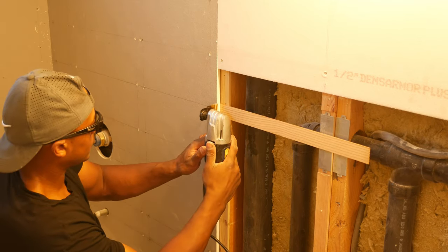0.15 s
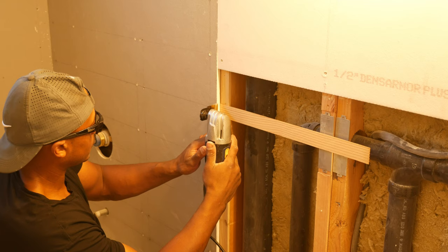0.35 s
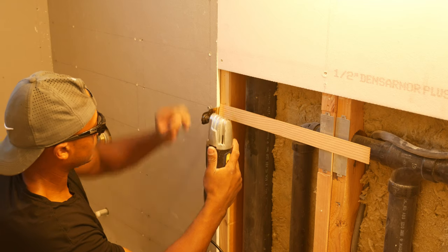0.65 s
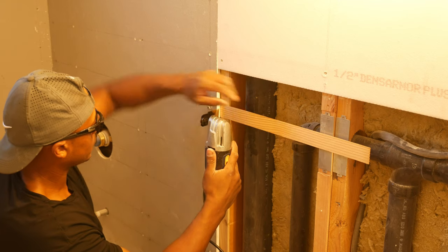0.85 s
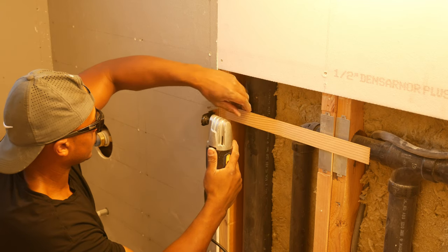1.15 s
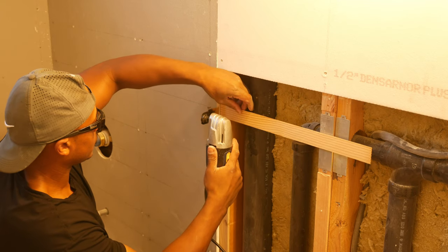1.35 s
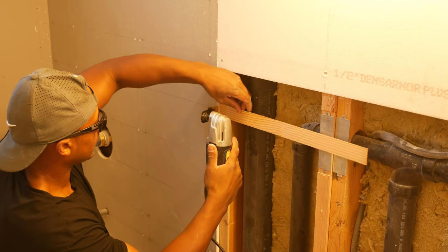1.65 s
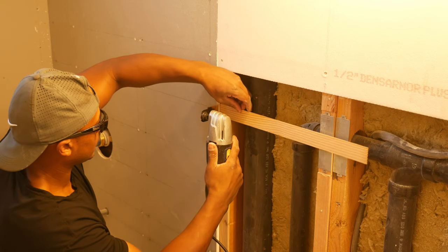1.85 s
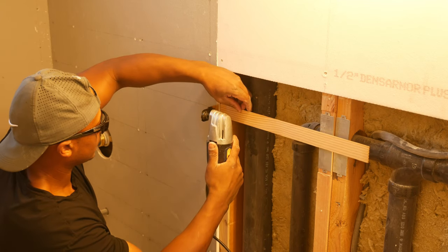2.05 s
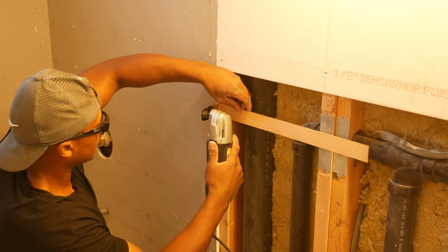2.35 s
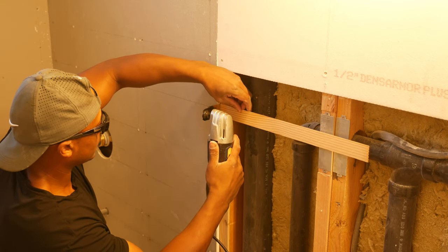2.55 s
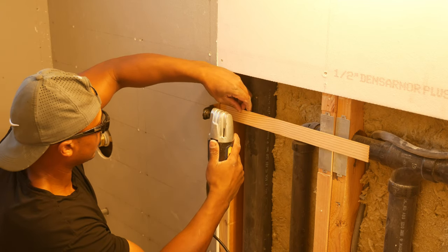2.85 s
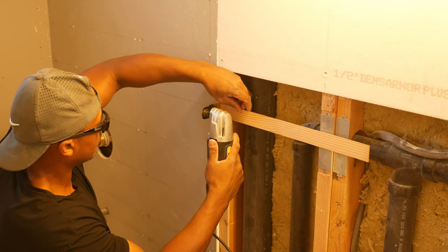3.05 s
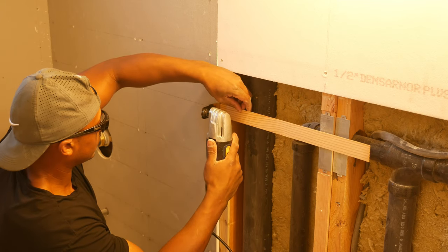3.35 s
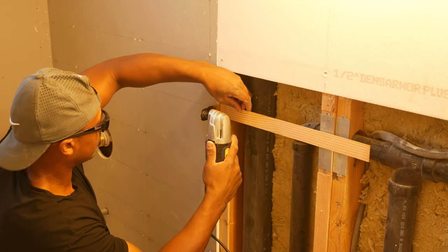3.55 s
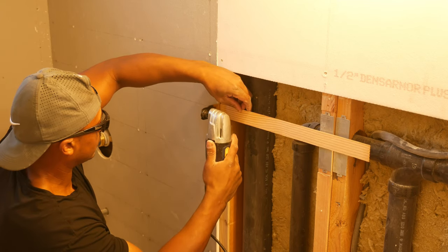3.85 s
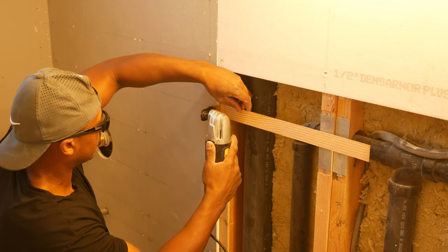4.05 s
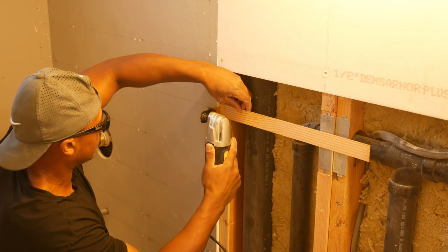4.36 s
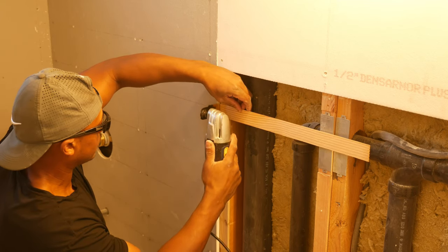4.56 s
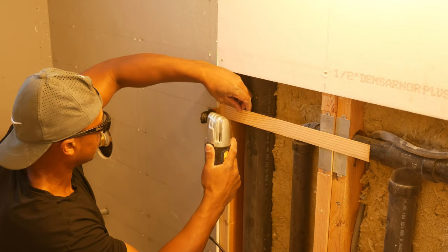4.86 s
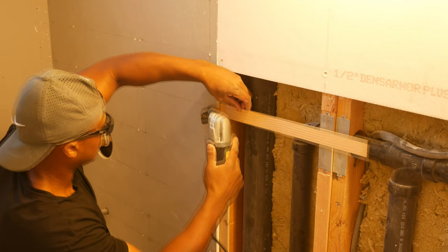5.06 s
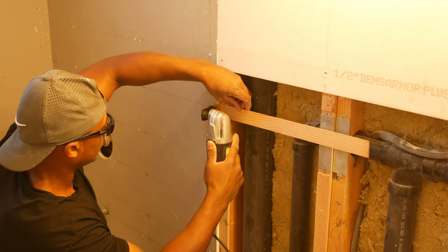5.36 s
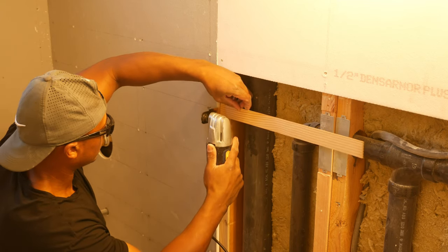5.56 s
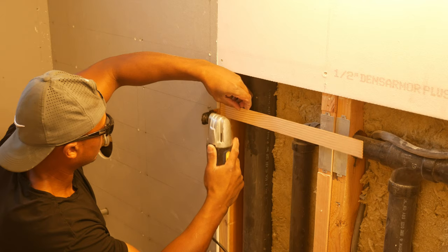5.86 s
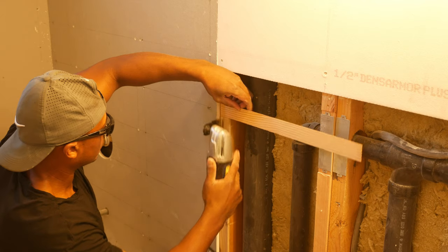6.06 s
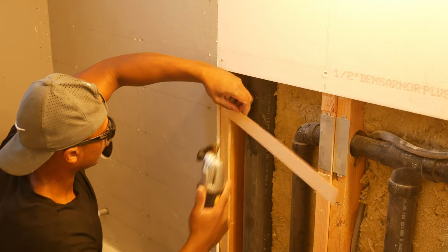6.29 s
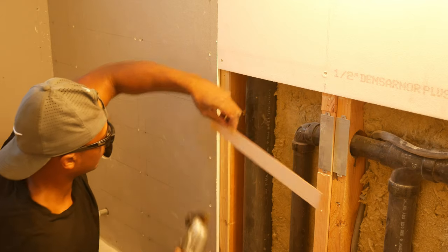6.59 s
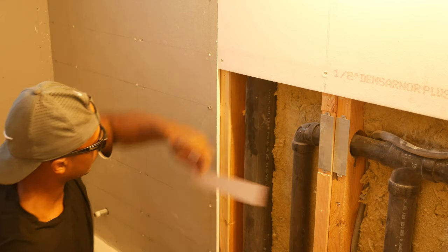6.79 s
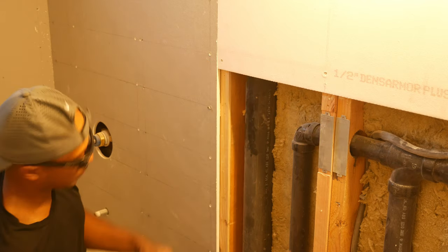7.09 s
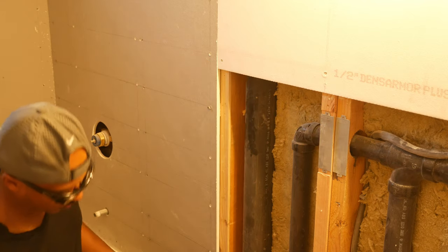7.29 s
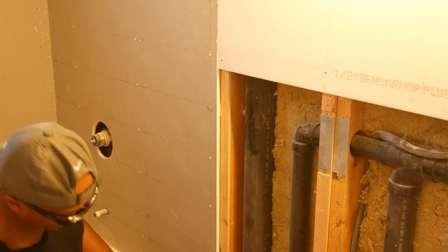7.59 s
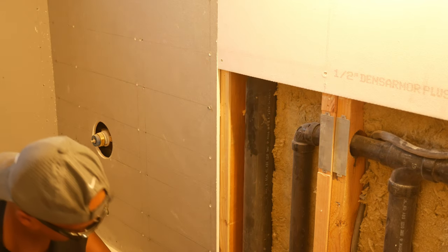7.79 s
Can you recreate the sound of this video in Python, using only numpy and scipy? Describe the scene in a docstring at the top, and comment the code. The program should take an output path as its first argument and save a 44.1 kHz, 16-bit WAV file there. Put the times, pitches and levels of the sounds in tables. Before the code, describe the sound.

Close in a small bare room, an oscillating multi-tool is already running, its nasal buzz rising slightly amid rattle and bright hiss. Pressed into a thin wooden strip, it slows, turns rough and raspy, and makes the wall hum. It breaks free, regains its speed, then switches off with its pitch starting to glide down. Nearly mono, dry, with short wall reflections.

```python
"""An oscillating multi-tool saws a thin wooden strip at a stud wall in a small bare room, heard almost in mono.
It opens running free and gaining speed: the mains motor swings the blade once a turn, a stack of shaft tones
rippled at twice the mains rate, amid rattling hiss, knocks and bright hiss bursts. From about 2.3 s, pressing
into the wood slows the shaft, shakes the wall into a hum and adds bright rasp. After 6.2 s the shaft recovers
freely; at 7.45 s the tool is switched off, and its tones glide down past resonances of the loose blade."""
import sys
import numpy as np
from scipy import signal
from scipy.fft import next_fast_len
from scipy.io import wavfile
from scipy.ndimage import uniform_filter1d, map_coordinates

SR = 44100
rng = np.random.default_rng(int(sys.argv[2]) if len(sys.argv) > 2 else 0)


def waveform_to_disk(signal):
    """Save audio, clipped to [-1, 1], as 16-bit WAV at the path in sys.argv[1]."""
    frames = np.transpose(np.atleast_2d(signal))
    scaled = np.clip(frames, -1, 1) * 32767
    samples = np.round(scaled).astype(np.int16)
    wavfile.write(sys.argv[1], SR, samples)


N = 349713
STEP = 64  # samples between control points
RIPPLE_HZ, OFF_S = 120, 7.449  # torque ripple at twice the mains rate; moment of switching off

# how irregular the swing of the blade is: (time [s], unevenness [0-1])
UNEVEN = [(0, .2), (1, .08), (3, .08), (3.4, .2), (4.9, .4), (5.05, .8), (5.4, .5), (6, .4), (6.5, .26),
          (7.4, .2), (7.55, .28), (7.93, .36)]
# spectrum of the rattling hiss and of the knocks: (frequency [Hz], relative density [dB per Hz])
RATTLE = [(25, -63), (280, -59), (370, -33), (560, -22), (1020, -12.5), (1300, -11.5), (2100, -11.5),
          (2600, -3.5), (3600, 0), (6000, -6), (8000, -9.5), (9700, -19.5), (10100, -24), (12800, -29.5),
          (14200, -44), (15500, -49)]
# resonances of the blade: (frequency [Hz], width [Hz], lift [dB])
BLADE = [(6000, 90, 4), (9630, 60, 6), (10375, 100, 13), (10745, 80, 9), (11480, 70, 10), (13125, 120, 11),
         (13700, 130, 9), (14420, 200, 7), (14880, 250, 7)]
# resonances of the housing, colouring hiss and knocks: (frequency [Hz], width [Hz], lift [dB])
HOUSING = [(1033, 81, -9), (2210, 120, -1), (2440, 150, 2), (3200, 380, -2), (3580, 280, 0), (4150, 140, 3),
           (5000, 390, 1), (3650, 64, 3.5), (4237, 55, 1), (2730, 48, 0.5), (3310, 30, 2.5),
           (2160, 100, -1)]


def gain_of(db):
    """Amplitude factor of a level in dB."""
    return 10 ** (np.asarray(db) / 20)


def evened(x):
    """Scale to an rms of one."""
    return x / np.sqrt(np.mean(x ** 2) + 1e-20)


def read(points, hz):
    """Read a spectrum table along a logarithmic frequency axis."""
    f, value = np.transpose(points)
    return np.interp(np.log(hz + 1), np.log(f + 1), value)


def curves(rows):
    """Turn each column of a time table into one value a sample."""
    s, *columns = np.transpose(rows)
    return [np.interp(np.arange(N) / SR, s, c) for c in columns]


def fine(points):
    """Control points joined up to one value a sample."""
    return np.interp(np.arange(N), np.arange(0, N, STEP), points)


def lift(modes, hz):
    """Sum of resonance bumps in dB."""
    return sum(db / (1 + (2 * (hz - f) / width) ** 2) for f, width, db in modes)


def drift(per_s, count):
    """Random curves of rms near 1, from per_s random points a second, read at the control steps."""
    points = rng.standard_normal((count, 400))
    at = np.arange(0, N, STEP) / SR * np.clip(per_s, .1, 45)
    return [map_coordinates(p, [at], order=1) for p in points]


def noise(points, modes, patchy_db, flicker_db):
    """Random short-time spectra with drifting patches and a flicker shared by all bands."""
    frames, hz = N // 256 + 5, np.fft.rfftfreq(1024, 1 / SR)
    real, imaginary, patches = rng.standard_normal((frames, 513, 3)).T
    patches = uniform_filter1d(patches, size=10, axis=0)  # across frequency
    patches = evened(uniform_filter1d(patches, size=12, axis=1))  # across time
    flicker = evened(uniform_filter1d(rng.standard_normal(frames), size=4))
    colour_db = (read(points, hz) + lift(modes, hz))[:, None]
    db = colour_db + patchy_db * patches + flicker_db * flicker
    spectra = (real + 1j * imaginary) * gain_of(db)
    return evened(signal.istft(spectra, nperseg=1024, noverlap=768)[1][:N])


def speed():
    """Shaft speed in Hz: gains toward free speed, is dragged by the cut, recovers, and runs down once off."""
    # the cut slows the shaft; after the last row it recovers freely: (time [s], drag [Hz])
    drag_rows = [(2.3, 0), (2.75, 1), (3.0, 2.3), (3.3, 4.6), (3.75, 6.9), (4.0, 9.4), (4.3, 13.7),
                 (4.7, 17.5), (5.0, 18.4), (5.05, 38.5), (5.14, 41.2), (5.9, 35.1), (6.0, 29.4),
                 (6.2, 21.8)]
    free_hz, start_short_hz = 189.3, 16.1  # unloaded speed; shortfall at the start
    recover_s, coast_s = .655, 1.03  # time constants of gaining speed and of running down
    t = np.arange(N) / SR
    driven = np.minimum(t, OFF_S)
    since_cut = np.maximum(driven - drag_rows[-1][0], 0)
    drag = curves(drag_rows)[0] * np.exp(-since_cut / recover_s)
    driven_hz = free_hz - start_short_hz * np.exp(-driven / recover_s) - drag
    return driven_hz * np.exp(-(t - driven) / coast_s)


def tones(hz, turn, uneven):
    """Shaft multiples and their mains companions; an uneven swing rocks them and breaks them up."""
    # the motor's whine at the frequency a tone has reached: (frequency [Hz], relative level [dB])
    whine = [(600, -21.5), (1000, -17.5), (1400, -13), (2100, -10.5), (2600, -2), (3600, -5), (4500, -5.5),
             (6000, -8), (8000, -25)]
    # resonances of housing and room corner that change a tone passing through:
    # (frequency [Hz], width [Hz], lift [dB])
    corner_modes = [(720.6, 17, 8.5), (802, 11, 11), (869, 92, 8.5), (942, 6.7, -16), (990, 13, -3),
                    (1281, 133, 9.5), (1612, 113, 6), (1626, 21, 4.5), (1696, 5.2, -3), (1823, 170, 3),
                    (2054, 76, 6), (2423, 18, -8), (2370, 35, 0.5), (2412, 43, 8), (2640, 10, 3),
                    (2767, 96, 3.5), (3010, 22, -6), (3153, 42, 5), (3432, 37, 8.5), (3684, 190, 5.5),
                    (3880, 37, 6), (4250, 78, 7), (3326, 60, 0)]
    # once the drive is off the loose blade resonates with the gliding tones:
    # (frequency [Hz], width [Hz], lift [dB])
    loose = [(2810, 110, 9.5), (3007, 100, 12), (3184, 130, 9.5), (3410, 130, 9), (4250, 100, -12),
             (4870, 1200, 1)]
    # one multiple sings out, or drops away, for a while:
    # (middle [s], half length [s], multiple of shaft speed, change [dB])
    swells = [(0.525, 0.046, 20, 8.5), (0.49, 0.27, 22, 2), (0.92, 0.17, 5, 9.5), (0.85, 0.089, 13, 5.5),
              (1.31, 0.2, 15, 7), (1.9, 0.32, 21, 6.5), (1.9, 0.27, 12, 7), (1.8, 1.3, 4, 6.5),
              (1.64, 2.46, 8, 6.5), (1.93, 0.67, 14, 5), (2.78, 0.4, 21, 9), (2.53, .25, 17, 5.5),
              (2.93, 0.33, 13, 7.5), (2.83, 0.17, 9, 7.5), (2.93, 0.2, 6, 9.5), (3.062, 0.1, 17, 7),
              (3.14, 0.23, 10, 9.5), (3.1, 0.14, 15, 7), (3.36, 0.46, 23, 6.5), (3.57, 0.31, 7, 5),
              (3.854, 0.082, 6, 15), (3.99, 0.19, 5, 13), (4.33, 0.28, 4, 12.5), (4.45, 0.23, 8, 7),
              (4.72, 0.48, 6, 11), (5.4, 0.5, 4, 10), (5.47, 0.07, 16, 3), (5.55, 0.17, 5, 14),
              (4.85, .15, 14, -4), (3.02, .12, 16, 5), (3.35, .1, 18, 7), (5.7, 0.29, 6, 9.5),
              (6.3, 0.24, 18, 2), (5.5, 0.16, 11, 7), (6.13, 0.14, 7, 7), (6.29, 0.068, 5, 6.5),
              (6.565, 0.064, 17, 15), (6.598, 0.11, 11, 10), (6.696, 0.18, 7, 4), (6.9, 0.27, 4, 5),
              (6.723, 0.1, 13, 16), (6.86, 0.049, 8, 16.5), (6.944, 0.048, 13, 8), (7.3, 0.11, 13, 3.5),
              (7.14, 0.37, 6, 7.5), (7.204, 0.14, 8, 12.5), (7.623, 0.14, 5, 6.5), (.4, .5, 6, -9),
              (0.27, 0.33, 12, -13), (.15, 0.18, 8, -1), (0.76, 0.25, 8, -15), (1.34, 0.11, 8, 1.5),
              (0.56, 0.2, 19, -12), (.45, 0.16, 16, -9), (0.83, 0.17, 17, 4), (1.46, 0.48, 17, -11),
              (1.5, 0.35, 13, 3), (1.24, 0.13, 9, -5), (2.3, 0.39, 25, -1), (2.8, 0.36, 4, 4),
              (2.25, 0.3, 15, -7), (6.3, 0.22, 14, -7), (6.3, 0.16, 16, -5), (1.9, 0.33, 18, -3),
              (1.9, .3, 24, -6), (1.7, .3, 16, -5), (2.5, .2, 18, -14), (2.88, 0.13, 18, 10),
              (2.85, 0.11, 24, 9.5), (3.14, 0.14, 8, 5), (3.8, .15, 11, 3), (3.37, 0.32, 10, -3),
              (4.1, 0.36, 9, 1.5), (4.35, .15, 11, 3), (4.5, 0.59, 19, 6), (4.5, 0.18, 21, -4),
              (5.7, 0.39, 7, 10), (5.806, 0.071, 5, 13.5), (6.3, .25, 12, -10), (6.447, 0.37, 19, 7),
              (6.45, 0.13, 6, -9), (4.5, 0.089, 5, 0), (5.7, 0.16, 12, 5), (7.35, .15, 16, -2),
              (7.35, .15, 11, -6), (7.7, .25, 21, -5), (7.8, 0.13, 14, -2), (0.15, 0.17, 21, 2),
              (6.58, 0.058, 7, 6.5), (7.66, 0.035, 5, 9), (5.78, .05, 11, 13), (4.4, 0.18, 19, 2.5),
              (3.4, 0.23, 4, -4)]
    # the pulsing torque gives multiples companions: (offset [ripple rates], level at the 20th multiple [dB])
    sidebands = [(1, -6), (2, -11.5)]
    sturdy_below = 14  # multiples under this one drop out less deeply
    rough_db, wander_db = 4, 1.6  # quick flutter, growing with multiple and unevenness; slow wandering
    peak_flutter = .9  # the flutter dips deeply but lifts a tone only this many spreads

    out, t = np.zeros(N), np.arange(0, N, STEP) / SR
    ripple_angle = 2 * np.pi * RIPPLE_HZ * np.arange(N) / SR
    rocked = turn + 0.22 * uneven * fine(drift(40., count=1)[0])
    parity = 2 * np.pi * rng.random(size=2)  # one phase for even multiples, one for odd
    hz, uneven = hz[::STEP], uneven[::STEP]
    coasting = np.clip((t - OFF_S) / 0.064, 0, 1)
    wavers = zip(range(4, 40), drift(4., count=36), drift(11., count=36), drift(40., count=36))
    for k, slow, quick, fast in wavers:
        swell = sum(db * np.exp(-((t - s) / half) ** 4) for s, half, order, db in swells if round(order) == k)
        depth_db = 6.3 + 20. * min(k / sturdy_below, 1) * (1 - .5 * coasting) * abs(quick)
        flutter = rough_db * (max(k, 9) / 15) * (0.32 + uneven) * np.minimum(fast, peak_flutter)
        fading = read(whine, k * hz) - uneven * depth_db + flutter
        resonance = lift(corner_modes, k * hz) + coasting * lift(loose, k * hz)
        level = gain_of(fading + resonance + swell + wander_db * slow)
        # loosely aligned: a pulse at each end of the swing
        start = parity[k % 2] + 1.11 * rng.standard_normal()
        out += fine(level) * np.cos(k * rocked + start)
        for (step, db), waver in zip(sidebands, drift(3., count=2) if 9 < k < 34 else []):
            resonance = lift(corner_modes, k * hz + step * RIPPLE_HZ)
            level = gain_of(fading + resonance + db + 4.6 * np.minimum(waver, 1)) * k / 20 * (1 - coasting)
            phase = start + 1.87 * rng.standard_normal()
            out += fine(level) * np.cos(k * rocked + round(step) * ripple_angle + phase)
    return out / np.sqrt(uniform_filter1d(out ** 2, size=16000, mode="reflect"))


def corner(x):
    """Sparse early reflections off the near walls, which carve fine peaks and dips into the sound."""
    echo_s = .03  # dying time
    at = np.sort(rng.uniform(.002, 2 * echo_s, size=40))
    taps = np.zeros(round(2 * echo_s * SR) + 1)
    taps[(at * SR).astype(int)] = rng.choice([-1., 1.], size=40) * np.exp(-at / echo_s)
    return evened(signal.oaconvolve(x, taps)[:N])


def knocks(turn, ripple):
    """Play in the fork knocks at both ends of each swing, never twice alike, and rings the blade."""
    spread_db, jitter_s = 3.5, .0001  # from knock to knock
    ends = np.flatnonzero(np.diff(np.floor(turn / np.pi)))
    size, late = rng.standard_normal((len(ends), 2)).T
    at = np.clip(ends + (jitter_s * SR * late).astype(int), 0, N - 1)
    clicks = np.zeros(N)
    clicks[at] = gain_of(spread_db * np.clip(size, -2, 1.3)) * (1 + 0.12 * ripple[ends])
    hz = abs(np.fft.fftfreq(4096, 1 / SR))
    colour_db = np.maximum(read(RATTLE, hz) + lift(BLADE + HOUSING, hz), -100)
    log_gain = np.log(gain_of(colour_db))
    # minimum phase, so that the ringing follows each click
    ring = np.fft.ifft(np.exp(log_gain - 1j * signal.hilbert(log_gain).imag)).real
    return evened(signal.oaconvolve(clicks, ring[:2048])[:N])


def tool(hz, turn, level_db, tonal_db):
    """Shaft tones, knocks and fan hiss that throbs with the swing and the mains."""
    # the rattle dulls while the blade is buried and as the tool runs down: (time [s], dull share [0-1])
    muffled = [(0, 0.15), (1, 0.14), (3, 0.15), (3.6, 0.23), (4.6, 0.2), (5.7, 0.2), (6.2, 0.18),
               (7.4, 0.18), (7.6, 0.22), (7.93, 0.4)]
    echo_db, shift_s = -3, 5  # reflections against the direct sound; period of their change
    knock_db, chatter_db = -7.5, 2.2  # knocks against hiss; shudder of the rattle at full unevenness
    t, uneven = np.arange(N) / SR, curves(UNEVEN)[0]
    ripple = np.sin(2 * np.pi * RIPPLE_HZ * t) * (t < OFF_S)
    bursts = (1 + 0.22 * np.cos(2 * turn)) * (1 + 0.023 * ripple)

    hiss = evened(noise(RATTLE, BLADE + HOUSING, patchy_db=1.8, flicker_db=.9))
    lean = 2 * np.pi * t / shift_s  # the reflections change as hands and tool move
    reflected = np.cos(lean) * corner(hiss) + np.sin(lean) * corner(hiss)
    hiss = evened(hiss + gain_of(echo_db) * reflected) * bursts
    knock = knocks(turn, ripple)
    knock = evened(knock + gain_of(echo_db) * corner(knock))
    rattle = evened(hiss + gain_of(knock_db) * knock)

    dull = np.clip(curves(muffled)[0], 0, 1)
    dulled = 2.06 * signal.lfilter(*signal.butter(2, 4300, fs=SR), rattle)
    rattle = (1 - dull) * rattle + dull * dulled
    rattle = rattle * gain_of(chatter_db * uneven * fine(drift(28., count=1)[0]))
    share = np.clip(gain_of(tonal_db), 0, .98)
    return gain_of(level_db) * (share * tones(hz, turn, uneven) + np.sqrt(1 - share ** 2) * rattle)


def bright_hiss(turn):
    """Bright hiss pulsing twice a turn: rasp while cutting, brief hiss bursts also while running free."""
    # spectrum of the bright hiss: (frequency [Hz], relative density [dB per Hz])
    bright_colour = [(1000, -39), (3000, 10.5), (6000, 9.5), (9000, 9.5), (12000, 4.5), (15500, -4.5)]
    # slowly changing bed of the hiss: (time [s], level [dB])
    bed = [(0, -40), (2.2, -41.5), (2.9, -37), (4.85, -40), (5.1, -47), (6.0, -56), (7.93, -77)]
    # brief bursts added to the bed, cutting or free: (middle [s], half length [s], level [dB])
    surges = [(0.01, 0.089, -43), (1.344, 0.15, -53), (2.298, 0.077, -43), (3.197, 0.14, -39),
              (3.5, 0.099, -45), (3.859, .1, -37.5), (4.298, 0.16, -36), (4.727, .08, -33.5),
              (5.186, 0.055, -40), (5.48, 0.046, -43), (5.662, .07, -40), (6.4, 0.14, -45),
              (7.0, 0.13, -49), (7.282, 0.14, -38), (7.5, 0.06, -38)]
    t, strokes = np.arange(N) / SR, 1 + .3 * np.cos(2 * turn)
    level = gain_of(curves(bed)[0])
    level = level + sum(gain_of(db) * np.exp(-((t - s) / half) ** 2) for s, half, db in surges)
    return level * evened(strokes * noise(bright_colour, [], patchy_db=0.0, flicker_db=1.0))


def hum(turn):
    """The three lowest shaft multiples, wavering, and the rumble of the shaken wall, following the first."""
    # hum levels ahead of the common cut below:
    # (time [s], wall at once a swing [dB], blade at twice [dB], blade at three times [dB])
    hum_rows = [(0.0, -76, -60, -40.5), (0.22, -80, -63.5, -46), (1.04, -75, -57.5, -36.5),
                (1.37, -64, -52, -39.5), (1.94, -80, -54, -42), (2.5, -71, -54, -41.5),
                (3.0, -64, -47.5, -41), (3.3, -60, -51, -42.5), (3.7, -53.5, -56.5, -42.5),
                (4.0, -50, -57, -50), (4.17, -52.5, -64, -53.5), (4.35, -45.5, -47, -45),
                (4.55, -50, -63, -51), (4.78, -46, -49, -36), (5.0, -49.5, -60, -45),
                (5.13, -45.5, -54, -48), (5.34, -40.5, -41, -47.5), (5.5, -49.5, -58, -52),
                (5.72, -41, -53, -51), (5.8, -54, -51, -47), (5.9, -51, -40.5, -50), (6.02, -69, -66, -44),
                (6.3, -88, -69, -47.5), (6.45, -88, -71, -58), (6.65, -90, -71, -62), (6.78, -86, -70, -45),
                (7.09, -78, -68, -39.5), (7.55, -84, -68, -49), (7.66, -75, -59, -37),
                (7.93, -91, -93, -69)]
    # spectrum of wall and strip rumbling: (frequency [Hz], relative density [dB per Hz])
    rumble_colour = [(20, -7), (60, -20), (130, -10), (300, -11.5), (600, 2), (1000, 6), (1700, 11),
                     (2400, -21), (4000, -46)]
    levels, waver, uneven = curves(hum_rows), drift(30., count=4), curves(UNEVEN)[0]
    rocked = turn + 0.67 * uneven * fine(waver[3])
    out = np.zeros(N)
    for k, db, quick, slow in zip((1, 2, 3), levels, waver, drift(12., count=3)):
        flutter_db = 12.8 * np.minimum(quick, .5) + 6 * np.minimum(slow, 1)  # at full unevenness
        out += np.sqrt(2) * gain_of(db + uneven * fine(flutter_db)) * np.cos(k * rocked)
    pressure_db = uniform_filter1d(levels[0], size=12000, mode="nearest")
    rumble = noise(rumble_colour, [], patchy_db=2.5, flicker_db=4.)
    return gain_of(-4.5) * out + gain_of(0.62 * pressure_db - 9.0) * rumble


def sides(level_db, wall):
    """A faint side layer: noise following the level of the tool, and quadrature hum."""
    # spectrum of the side noise: (frequency [Hz], relative density [dB per Hz])
    side_colour = [(35, -63), (60, -24), (166, -66), (551, -10), (3580, 4.5), (7860, -3), (15000, -27.5)]
    apart = gain_of(level_db - 21.5) * noise(side_colour, [], patchy_db=4.0, flicker_db=5.0)
    # a quarter turn of phase
    return apart + gain_of(-24) * signal.hilbert(wall, next_fast_len(N)).imag[:N]


def scene():
    """One shaft drives tool, bright hiss and wall hum, heard from the centre with a faint side layer."""
    # tones and rattle together: (time [s], level [dB])
    tool_rows = [(0.0, -21), (0.02, -19), (0.93, -20.5), (1.26, -19.5), (4.13, -21), (4.37, -20),
                 (4.46, -22.5), (4.82, -20), (4.97, -27), (5.17, -20), (5.79, -21.5), (5.9, -24.5),
                 (6.1, -20.5), (6.65, -20.5), (6.87, -21.5), (7.55, -19.5), (7.91, -24), (7.93, -24)]
    hz, level_db = speed(), curves(tool_rows)[0]
    turn = 2 * np.pi * np.cumsum(hz) / SR  # shaft angle in radians
    # share of the tool's level carried by shaft tones, 3 dB less at full unevenness
    tonal_db = -2.5 - 3 * curves(UNEVEN)[0]
    wall = hum(turn)
    centre = tool(hz, turn, level_db, tonal_db) + wall + bright_hiss(turn)
    apart = sides(level_db, wall)
    return np.array([centre + apart, centre - apart])


def record(dry):
    """The band limit: a steep low-pass at 15620 Hz."""
    lowpass = signal.firwin(2047, 15620, window=("kaiser", 9), fs=SR)
    return signal.oaconvolve(dry, lowpass[None], "same")


dry = scene()
out = record(dry)
waveform_to_disk(out)
```